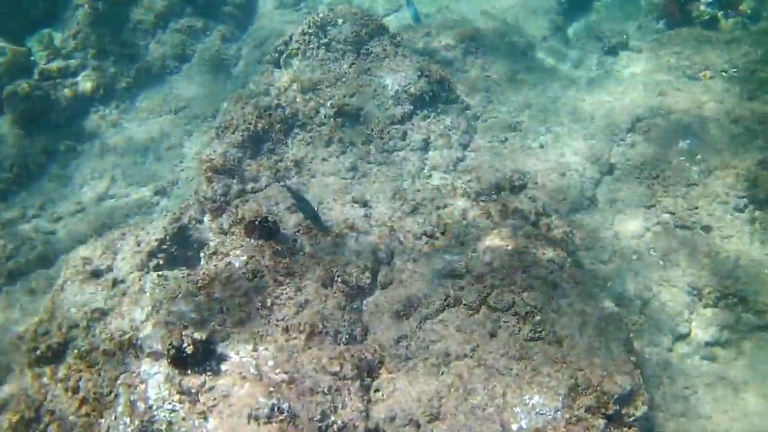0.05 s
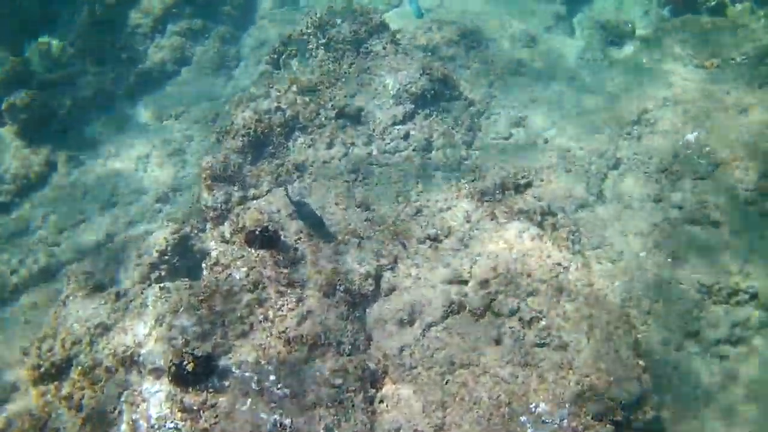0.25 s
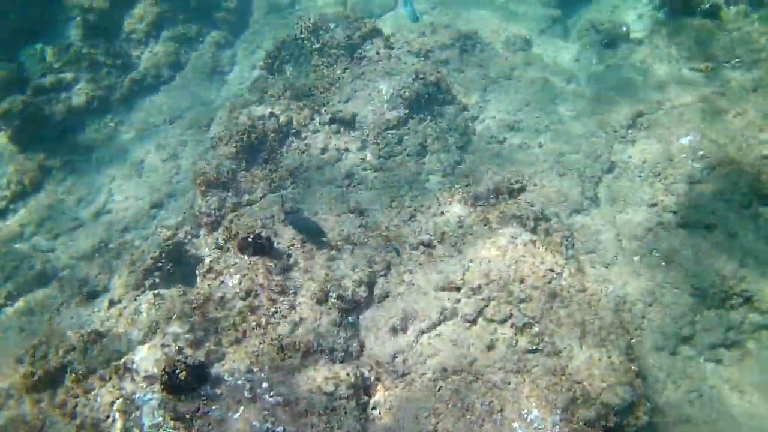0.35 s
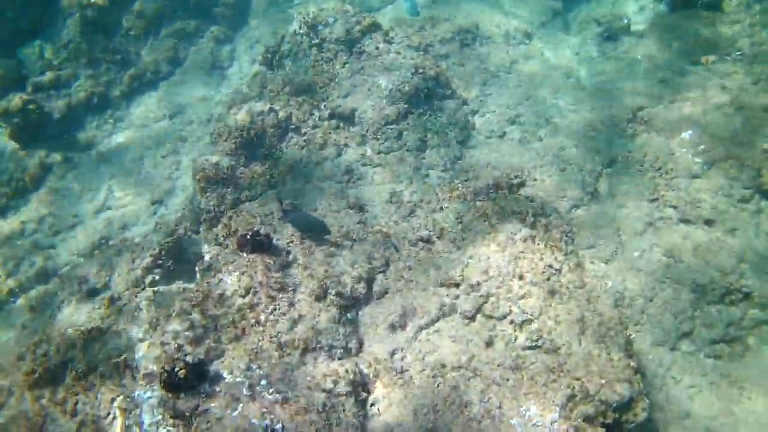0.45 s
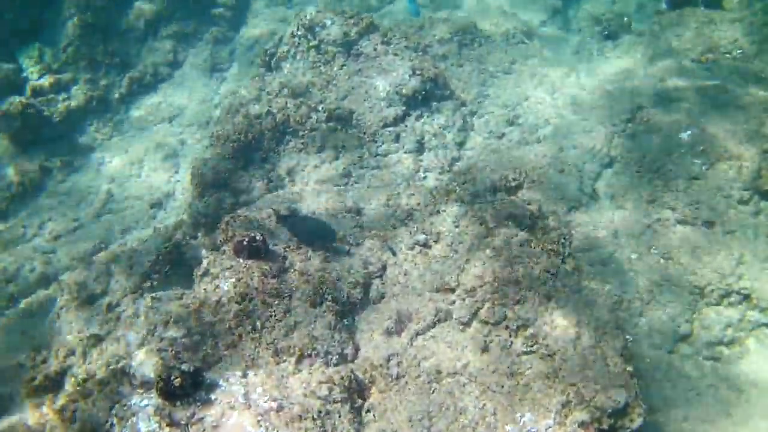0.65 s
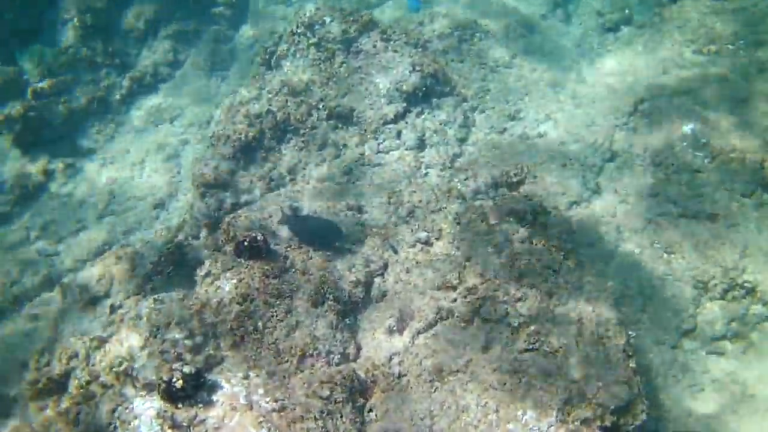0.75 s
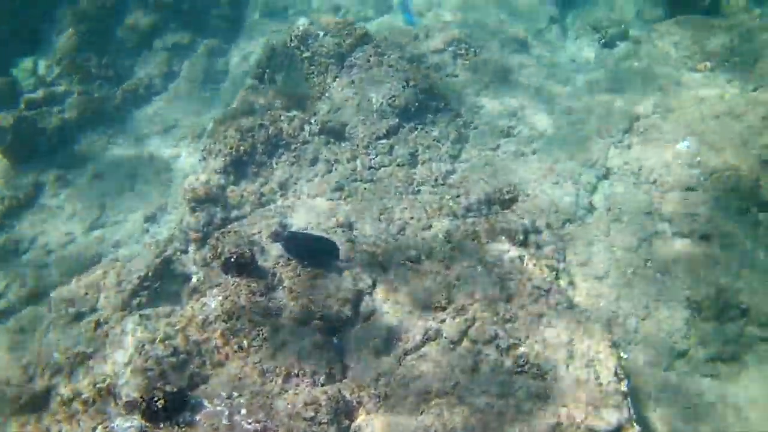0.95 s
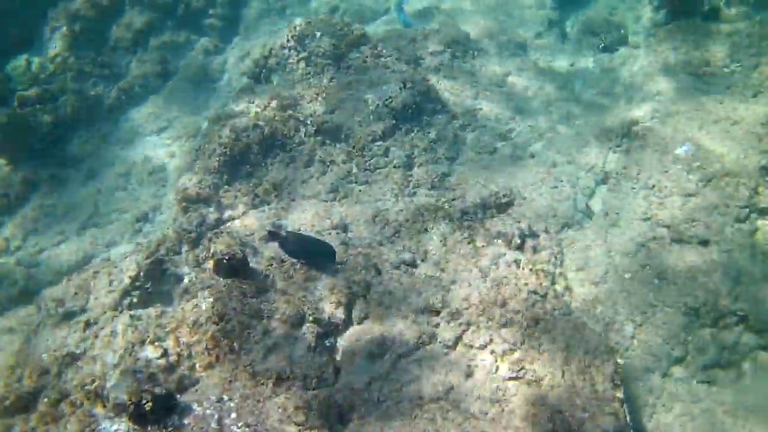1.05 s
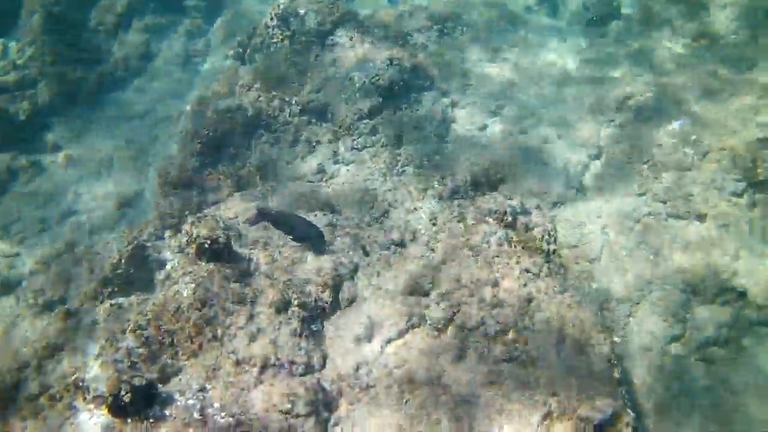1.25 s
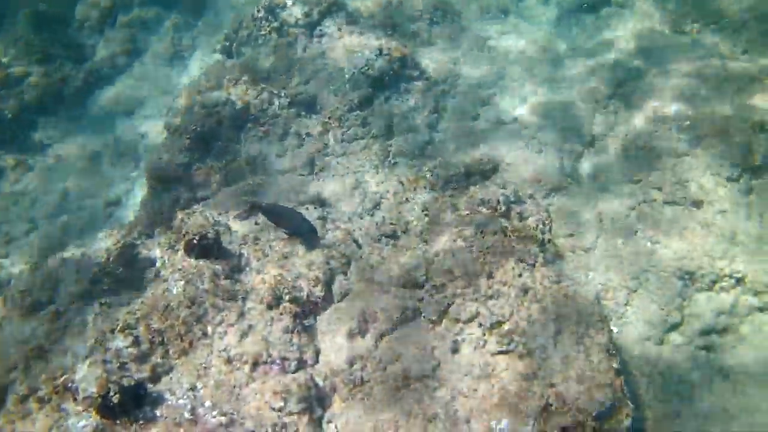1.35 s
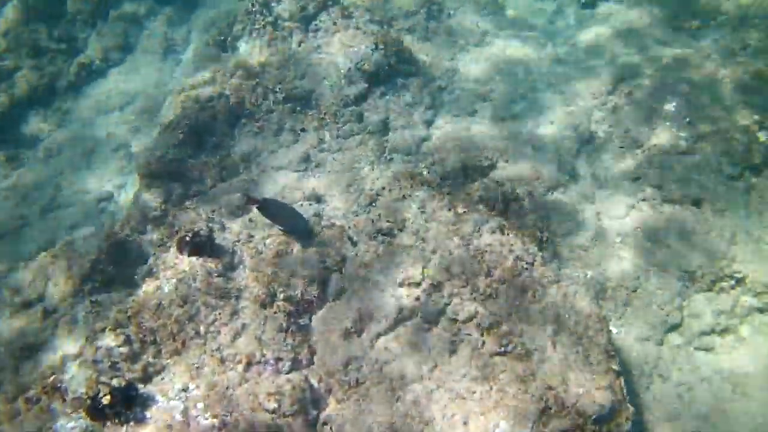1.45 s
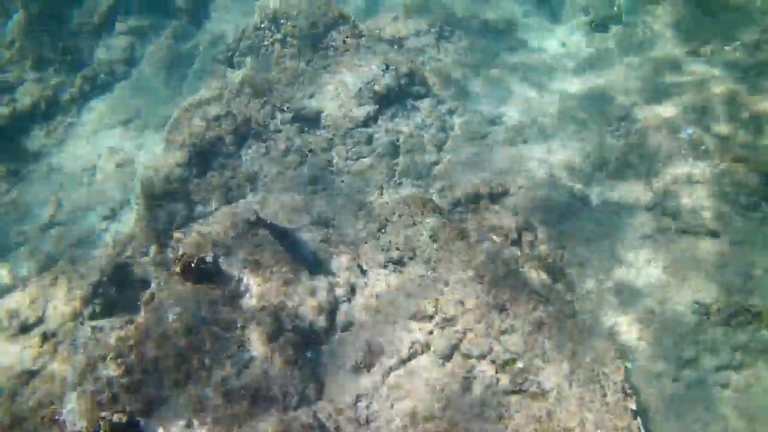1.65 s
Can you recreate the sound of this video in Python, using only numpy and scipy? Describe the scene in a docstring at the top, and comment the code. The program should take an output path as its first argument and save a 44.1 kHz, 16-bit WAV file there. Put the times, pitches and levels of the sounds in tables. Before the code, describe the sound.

One gliding whale moan rises, dips and rises underwater, amid shrimp snaps and steady water hiss

```python
"""A humpback whale sings one near-pure moan that arches up, sinks and climbs again: a gliding sine with resonant overtones.
Far whales hoot (short gliding sines), a grunt passes (sine pulses); gurgles (decaying noise bands) and
low knocks (damped sines) come before and after it. Snapping shrimp crackle (filtered clicks) in steady shaped
water noise over a rocky reef. Snaps and hiss ring in the camera's housing; a low rumble swells and sinks,
a faint fizz comes and goes."""
import sys
import numpy as np
from scipy import signal
from scipy.fft import rfft, irfft
from scipy.io import wavfile
from scipy.ndimage import uniform_filter1d

SR = 44100
rng = np.random.default_rng(int(sys.argv[2]) if len(sys.argv) > 2 else 0)


def output_pcm(signal):
    """Save a mono or channel-first signal as 16-bit PCM at the path in sys.argv[1].

    Samples are clipped to [-1, 1] before scaling.
    """
    pcm = np.clip(np.atleast_2d(signal).T, -1, 1) * 32767
    wavfile.write(sys.argv[1], SR, np.round(pcm).astype(np.int16))


N = 74970
T = np.arange(N) / SR   # s


def from_db(db):
    """Decibels to amplitude gain."""
    return 10 ** (np.asarray(db) / 20)


def rms_one(x):
    """Scale to unit rms."""
    return x / np.sqrt(np.mean(x ** 2) + 1e-20)


def curve(rows, size=220):
    """Join (t, value) rows linearly; round corners over size samples."""
    return uniform_filter1d(np.interp(T, *np.transpose(rows)), size)


def lowpass(x, order, hz):
    """Butterworth low-pass."""
    return signal.sosfilt(signal.butter(order, hz, fs=SR, output="sos"), x)


def drift(hz):
    """Random wander below hz, unit rms."""
    settled = lowpass(rng.standard_normal(2 * N), 2, hz)[N:]
    return rms_one(settled)


def resonate(x, hz, width_hz):
    """One resonance, unit gain at its peak."""
    b, a = signal.iirpeak(hz, hz / min(width_hz, SR / 4), fs=SR)
    return signal.lfilter(b, a, x + 1e-18)


def band(x, hz, width_hz):
    """A resonance applied twice, for steep sides."""
    return resonate(resonate(x, hz, width_hz), hz, width_hz)


def noise_band(hz, width_hz):
    """Settled unit-rms noise in one band."""
    return rms_one(band(rng.standard_normal(2 * N), hz, width_hz)[N:])


# moan pitch: t/s, f/Hz (before jitter)
MOAN_PITCH_HZ = [(.33, 444.3), (.40, 413.8), (.426, 479.4), (.438, 504.3), (.447, 567.5), (.48, 621.7),
                 (.515, 659), (.55, 665), (.595, 666), (.65, 656.4), (.70, 633.3), (.755, 593.7),
                 (.80, 509.7), (.85, 434), (.90, 375.7), (.96, 366), (1.02, 388.8), (1.06, 419),
                 (1.078, 480), (1.11, 481.5), (1.21, 547.7), (1.275, 571.3), (1.297, 599), (1.325, 595.6),
                 (1.37, 609.4), (1.46, 638), (1.53, 682)]
# moan fundamental: t/s, level/dB rms (before shimmer)
MOAN_LEVEL_DB = [(.31, -58), (.34, -56.5), (.422, -49), (.431, -35), (.438, -30.5), (.444, -39.5),
                 (.45, -31), (.466, -27.5), (.479, -30), (.493, -30), (.507, -34), (.59, -36.5), (.66, -34),
                 (.73, -28.5), (.753, -29.5), (.772, -37.5), (.79, -38), (.812, -33.5), (.822, -41.5),
                 (.838, -38), (.848, -48.5), (.91, -54), (.96, -46.5), (1.01, -51.5), (1.04, -44),
                 (1.07, -47.5), (1.081, -34.5), (1.145, -33.5), (1.20, -42), (1.275, -38.5), (1.325, -36),
                 (1.41, -39), (1.49, -52.5), (1.55, -63.5)]
MOAN_JITTER_REL, MOAN_SHIMMER_DB = 0.0015, 0.17   # rms
OCTAVE_DB, OCTAVE_PEAK_HZ, OCTAVE_WIDTH_HZ = -27, 1346, 83
THIRD_DB, THIRD_PEAK_HZ, THIRD_WIDTH_HZ = -23.5, 1726, 93   # third harmonic


def moan():
    """A gliding, almost pure tone whose overtones light up as they cross resonances."""
    hz = curve(MOAN_PITCH_HZ, size=500) * (1 + MOAN_JITTER_REL * drift(90))
    phase = 2 * np.pi * np.cumsum(hz) / SR
    sounding = (T > MOAN_LEVEL_DB[0][0]) & (T < MOAN_LEVEL_DB[-1][0])
    level_db = curve(MOAN_LEVEL_DB) + MOAN_SHIMMER_DB * drift(42)
    level = np.sqrt(2) * sounding * from_db(level_db)   # rms to peak
    octave = from_db(OCTAVE_DB) * band(level * np.sin(2 * phase), OCTAVE_PEAK_HZ, OCTAVE_WIDTH_HZ)
    third = from_db(THIRD_DB) * band(level * np.sin(3 * phase), THIRD_PEAK_HZ, THIRD_WIDTH_HZ)
    return level * np.sin(phase) + octave + third


# far hoots: start t/s, length/s, start f/Hz, end f/Hz, mid-note level/dB rms (before flicker)
FAR_HOOTS = [(0.0, 0.059, 612, 554, -59.5), (0.055, 0.043, 490, 475, -49.5),
             (0.091, 0.023, 897.6, 865, -47.5), (0.097, 0.026, 823, 804, -52.5),
             (.125, 0.022, 485, 495, -50.5), (0.178, 0.052, 480, 470, -56),
             (0.208, .042, 395.6, 417, -43.5), (0.324, .03, 453.6, 475, -54.5),
             (0.358, 0.015, 784, 792, -51), (0.365, 0.028, 495, 471, -52), (0.499, 0.1, 380, 499, -57),
             (0.847, 0.011, 790, 775, -49.5), (1.27, 0.034, 278.3, 282, -52), (1.571, 0.024, 430, 492, -54)]
HOOT_ATTACK_S, HOOT_RELEASE_S = 0.0039, 0.003
HOOT_SAG_DB, HOOT_FLICKER_DB = 5.5, 1.5


def hoots():
    """Short gliding notes of distant whales: quick attack, sag, release."""
    out = np.zeros(N)
    for start_s, length_s, start_hz, end_hz, db in FAR_HOOTS:
        age = T - start_s
        along = np.clip(age / length_s, 0, 1)
        attack = np.clip(age / HOOT_ATTACK_S, 0, 1)
        release = np.clip((length_s - age) / HOOT_RELEASE_S + .5, 0, 1)
        phase = 2 * np.pi * np.cumsum(start_hz + (end_hz - start_hz) * along) / SR
        level_db = db + HOOT_SAG_DB * (.5 - along) + HOOT_FLICKER_DB * drift(70)
        out += np.sqrt(2) * attack * release * from_db(level_db) * np.sin(phase)
    return out


# grunt pulses: start t/s, f/Hz, envelope peak level/dB
GRUNT_PULSES = [(.650, 361, -38), (.669, 391.7, -37), (.679, 425, -30), (0.694, 350, -33),
                (0.707, 383, -32.5), (.717, 432, -35), (.726, 450, -35.5)]
GRUNT_SWELL_S = 0.0049   # onset to peak


def grunt():
    """An uneven run of pulses, each a few cycles long."""
    out = np.zeros(N)
    for start_s, hz, db in GRUNT_PULSES:
        age = np.maximum(T - start_s, 0)
        swell = age / GRUNT_SWELL_S
        envelope = (swell * np.exp(1 - swell)) ** 4
        out += from_db(db) * envelope * np.sin(2 * np.pi * hz * age)
    return out


SEA_T60_S, SEA_BUILDUP_S, SEA_DB = 1, 0.014, -26.5


def sea(x):
    """Long diffuse reverberation between surface and seabed: convolution with decaying noise."""
    tail = rng.standard_normal(N) * from_db(-60 * T / SEA_T60_S) * (1 - np.exp(-T / SEA_BUILDUP_S))
    unit_energy = tail / np.sqrt(np.sum(tail ** 2))
    return from_db(SEA_DB) * signal.fftconvolve(x, unit_energy)[:N]


# gurgles: start t/s, centre f/Hz, width/Hz, level/dB rms (before attack and decay), t60/s
WATER_GURGLES = [(.093, 845, 237, -44, 0.064), (0.298, 1684, 348, -47.5, 0.074),
                 (0.361, 778, 248, -55, 0.2), (0.421, 1400, 252, -54.5, 0.092),
                 (0.837, 796, 259, -58, 0.16), (1.237, 1540, 350, -46, 0.047),
                 (1.271, 1600, 414.6, -55.5, 0.2), (1.322, 800, 148, -51, 0.046),
                 (1.348, 2280, 250, -59, 0.032), (1.391, 2132, 200, -57, 0.067),
                 (1.448, 1800, 200, -52, 0.043)]
GURGLE_ATTACK_S = 0.0017


def gurgles():
    """Sudden splutters of tiny bubbles around one pitch, as quickly dying noise bands."""
    out = np.zeros(N)
    for start_s, hz, width_hz, db, t60_s in WATER_GURGLES:
        age = np.maximum(T - start_s, 0)
        bubbles = rms_one(band(rng.standard_normal(N), hz, width_hz))
        attack = 1 - np.exp(-age / GURGLE_ATTACK_S)
        out += from_db(db - 60 * age / t60_s) * attack * bubbles
    return out


# low knocks: start t/s, f/Hz, peak level/dB (before attack and decay), t60/s
LOW_KNOCKS = [(0.147, 67.4, -36.5, 0.27), (0.51, 199, -42.5, .07), (1.498, 174, -39.5, 0.059)]
KNOCK_ATTACK_S = 0.0065


def knocks():
    """Dull bumps, each one damped low mode."""
    out = np.zeros(N)
    for start_s, hz, db, t60_s in LOW_KNOCKS:
        age = np.maximum(T - start_s, 0)
        attack = 1 - np.exp(-age / KNOCK_ATTACK_S)
        out += from_db(db - 60 * age / t60_s) * attack * np.sin(2 * np.pi * hz * age)
    return out


# housing resonances: f/Hz, width/Hz, own peak gain/dB
HOUSING_MODES = [(859, 80, 7), (1510, 70, 2), (1725, 95, 15), (2110, 320, 6.5), (2865, 140, 8),
                 (3076, 100, 5.5), (3274, 70, 10.5), (3830, 70, 5.5), (3920, 33, 7), (4310, 20, 6),
                 (5524, 54, 5.5), (5850, 70, 0), (6790, 260, 6), (9950, 1600, -0.5)]


def housing(x):
    """The housing's resonances ring on with whatever passes through."""
    return x + sum((from_db(db) - 1) * resonate(x, hz, width_hz) for hz, width_hz, db in HOUSING_MODES)


SNAP_WIDTH_REL = 0.96   # width / centre f
SNAP_ECHO_S, SNAP_ECHO_DB = 0.0019, -5
SNAP_SCATTER_DB, SNAP_T60_S = -10, 0.014
SNAP_TAIL_DB, SNAP_TAIL_T60_S = -24.5, 0.086
SNAP_PRECURSOR_S, SNAP_PRECURSOR_DB = 0.00096, -13   # the claw shuts just before the bubble collapses
SNAP_DULL_HZ, SNAP_TREBLE_HZ, SNAP_TREBLE_DB = 7000, [9000, 11500], -4.5


def snap(hz, size=4096):
    """One collapsing bubble: a click, its bounce off the rock and a scattered tail; unit energy."""
    age = T[:size]
    scatter = from_db(SNAP_SCATTER_DB - 60 * age / SNAP_T60_S)
    tail = from_db(SNAP_TAIL_DB - 60 * age / SNAP_TAIL_T60_S)
    click = rng.standard_normal(size) * (scatter + tail)
    click[0] += 1
    click[int(SNAP_ECHO_S * rng.uniform(.8, 1.2) * SR)] += from_db(SNAP_ECHO_DB)
    click = np.pad(click, (int(SNAP_PRECURSOR_S * SR) + 1, 0))
    click[0] = from_db(SNAP_PRECURSOR_DB)
    coloured = resonate(click, hz, SNAP_WIDTH_REL * hz)
    coloured = resonate(coloured, hz, 2 * SNAP_WIDTH_REL * hz)
    rung = housing(coloured)
    treble_band = signal.butter(3, SNAP_TREBLE_HZ, "band", fs=SR, output="sos")
    treble = from_db(SNAP_TREBLE_DB) * signal.sosfilt(treble_band, rung)
    sound = lowpass(rung, 6, SNAP_DULL_HZ) + treble
    return sound / np.sqrt(np.sum(sound ** 2))


# near snaps: main click t/s, level/dB (SNAP_DB is added), centre f/Hz
NEAR_SNAPS = [(.1218, -53, 5000), (.154, -44.5, 4170), (0.1758, -46, 4200), (.2205, -43.5, 3520),
              (0.298, -38, 2370), (0.3678, -46.5, 2480), (0.476, -45.5, 3500), (0.4951, -27.5, 2720),
              (.543, -50, 4100), (.6086, -52, 3900), (0.6546, -50, 5440), (0.7535, -46.5, 4500),
              (0.835, -46.5, 6586), (1.0438, -42, 5000), (1.0515, -41.5, 3930), (1.1505, -45.5, 5500),
              (1.2095, -50.5, 5427), (1.4262, -44, 6137), (1.452, -53, 3000), (1.5183, -47, 4000),
              (1.6162, -47.5, 3187)]
SNAP_DB = 12.5
FAR_SNAPS_PER_S, FAR_SNAPS_DB, FAR_SNAPS_SPREAD_DB = 190, -75.5, 2


def shrimp():
    """Single near snaps over the random crackle of the colony."""
    near = np.zeros(2 * N)
    for click_s, db, hz in NEAR_SNAPS:
        sound = from_db(db + SNAP_DB) * snap(hz)
        at = int((click_s - SNAP_PRECURSOR_S) * SR)
        near[at:at + len(sound)] += sound
    sizes_db = FAR_SNAPS_SPREAD_DB * np.minimum(rng.exponential(1, N), np.pi)
    sizes = from_db(sizes_db) * rng.choice([-1, 1], N)
    clicks = sizes * (rng.random(N) < FAR_SNAPS_PER_S / SR)
    scatter = rng.standard_normal(N) * from_db(-60 * T / SNAP_T60_S)
    crackle = lowpass(signal.fftconvolve(clicks, scatter)[:N], 4, 7000)
    far = housing(resonate(crackle, 3600, 5200))
    return near[:N] + from_db(FAR_SNAPS_DB) * rms_one(far)


# water noise spectrum before the housing: f/Hz, relative level/dB
WATER_SPECTRUM = [(20, 11), (45, 4.5), (90, -2), (130, 0.5), (250, -0.5), (330, 0.5), (600, -1.5),
                  (750, -6), (1100, -12), (1600, -16), (2300, -20.5), (4000, -22.5), (7200, -25),
                  (7900, -29.5), (9000, -26), (15000, -29)]
WATER_DB, WATER_FLICKER_DB = -56, 1   # rms
# far-song drones: f/Hz, width/Hz, level/dB rms
SONG_DRONES = [(408, 110, -61.5), (500.5, 61, -63.5), (611, 66, -65)]


def water():
    """Steady broad noise through the housing, with narrow noise drones, the blur of far song."""
    hz, db = np.transpose(WATER_SPECTRUM)
    bins_hz = np.maximum(np.fft.rfftfreq(N, 1 / SR), 1)
    gain = from_db(np.interp(np.log(bins_hz), np.log(hz), db))
    hiss = irfft(rfft(rng.standard_normal(N)) * gain, N)
    out = from_db(WATER_DB + WATER_FLICKER_DB * drift(44)) * rms_one(housing(hiss))
    for drone_hz, width_hz, drone_db in SONG_DRONES:
        out += from_db(drone_db) * noise_band(drone_hz, width_hz)
    return out


# rumble: t/s, level/dB rms
RUMBLE_LEVEL_DB = [(0, -55.5), (.22, -55.5), (.30, -71), (.45, -62.5), (.58, -54), (.69, -67), (.80, -60),
                   (1.0, -65.5), (1.15, -61), (1.29, -62.5), (1.39, -55), (1.52, -62.5), (1.6, -67),
                   (1.7, -75)]
RUMBLE_HZ, RUMBLE_WIDTH_HZ = 70.1, 10.5


def rumble():
    """A narrow low noise drone that swells and sinks."""
    return from_db(curve(RUMBLE_LEVEL_DB)) * noise_band(RUMBLE_HZ, RUMBLE_WIDTH_HZ)


FIZZ_AT_S, FIZZ_SPREAD_S, FIZZ_HZ, FIZZ_DB = .71, .018, 11000, -72


def fizz():
    """A faint, brief Gaussian swell of bright hiss beside the grunt."""
    swell = np.exp(-((T - FIZZ_AT_S) / FIZZ_SPREAD_S) ** 2)
    hiss = rms_one(resonate(rng.standard_normal(N), FIZZ_HZ, FIZZ_HZ / 2))
    return from_db(FIZZ_DB) * swell * hiss


def scene():
    """Sum all layers to one channel; only moan, hoots and grunt feed the sea reverberation."""
    song = moan() + hoots() + grunt()
    passing = gurgles() + knocks()
    background = shrimp() + water() + rumble() + fizz()
    return (song + sea(song) + passing + background)[None]


CUTOFF_HZ = 15000


def record(dry):
    """Steep elliptic low-pass."""
    return signal.sosfilt(signal.ellip(12, .1, 70, CUTOFF_HZ, fs=SR, output="sos"), dry)


dry = scene()
out = record(dry)
output_pcm(out)
```